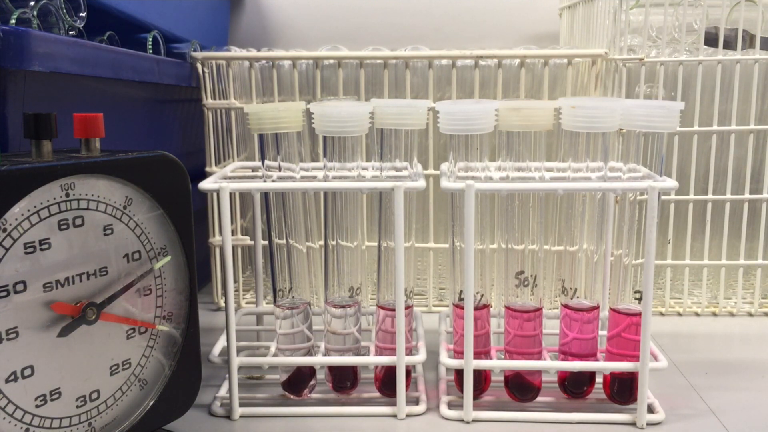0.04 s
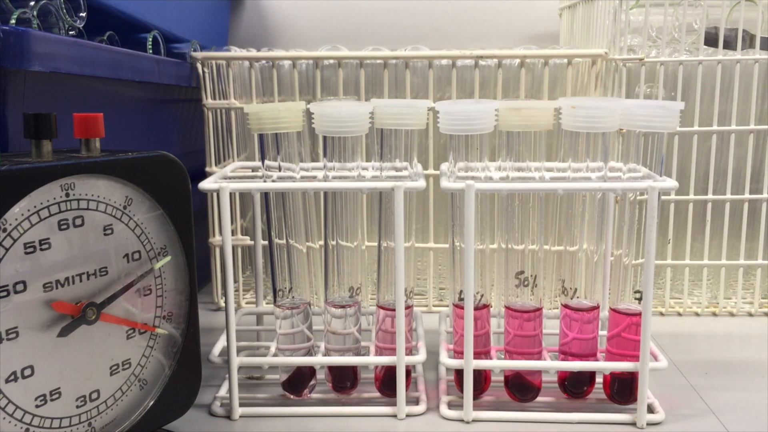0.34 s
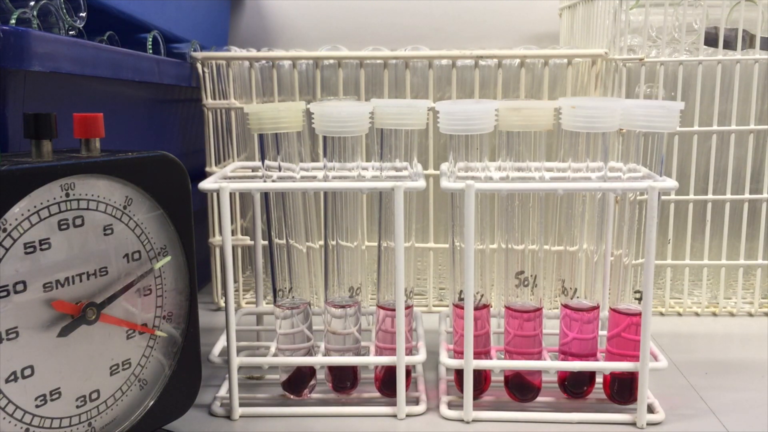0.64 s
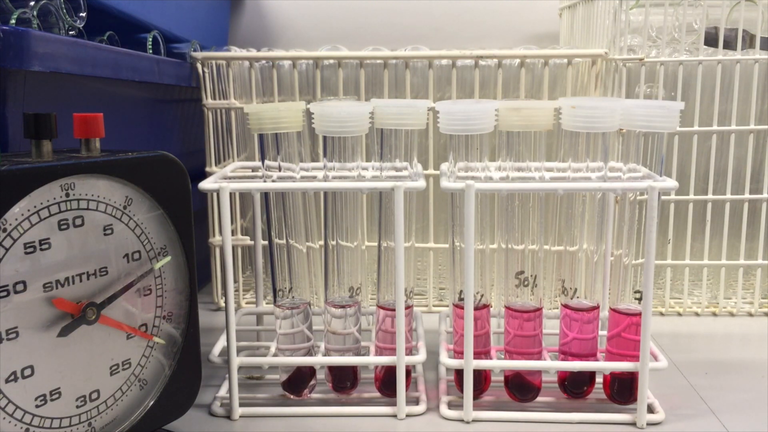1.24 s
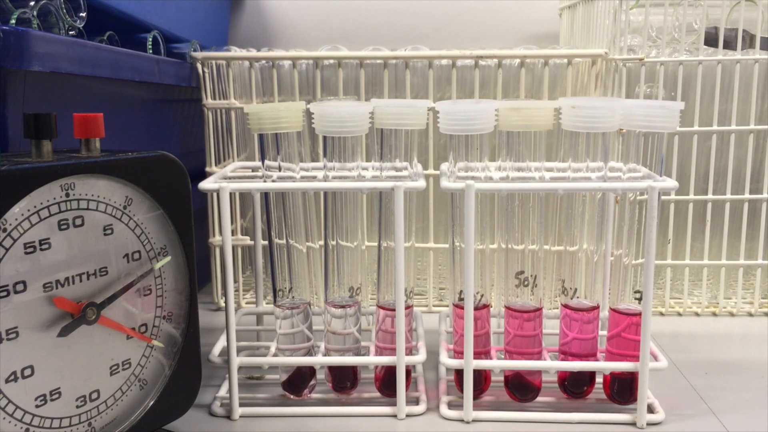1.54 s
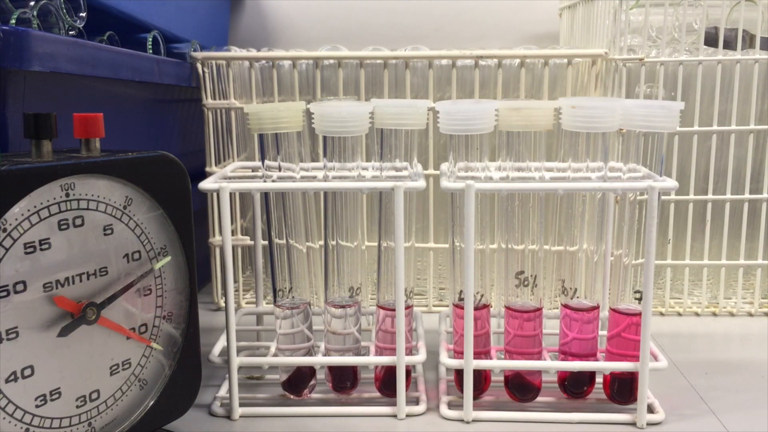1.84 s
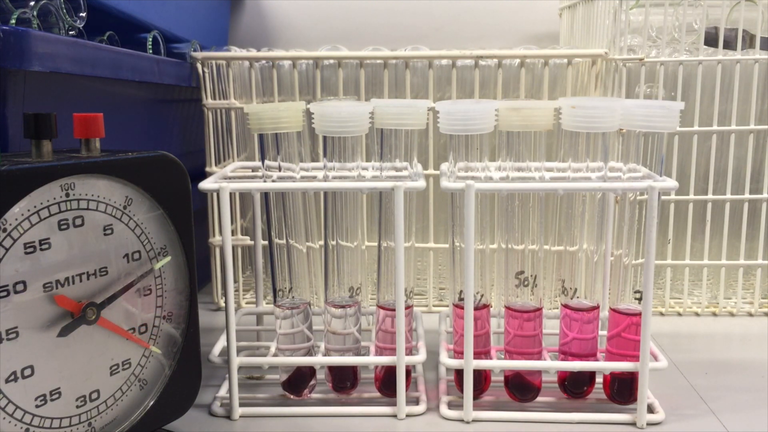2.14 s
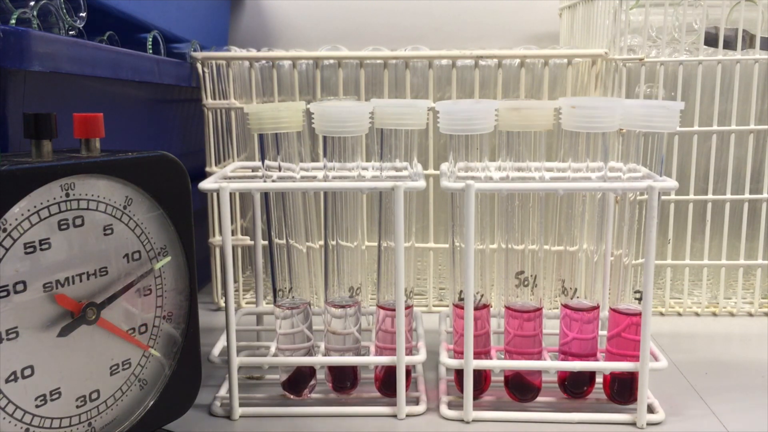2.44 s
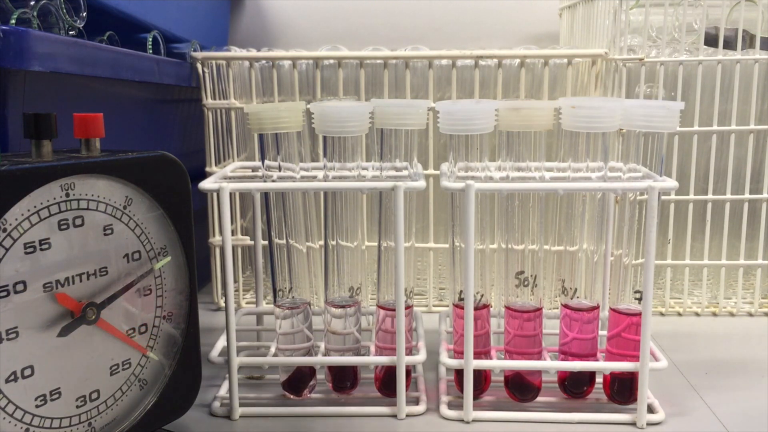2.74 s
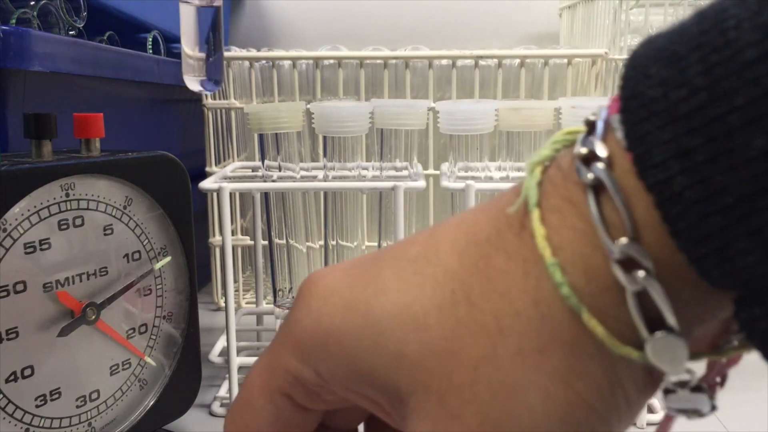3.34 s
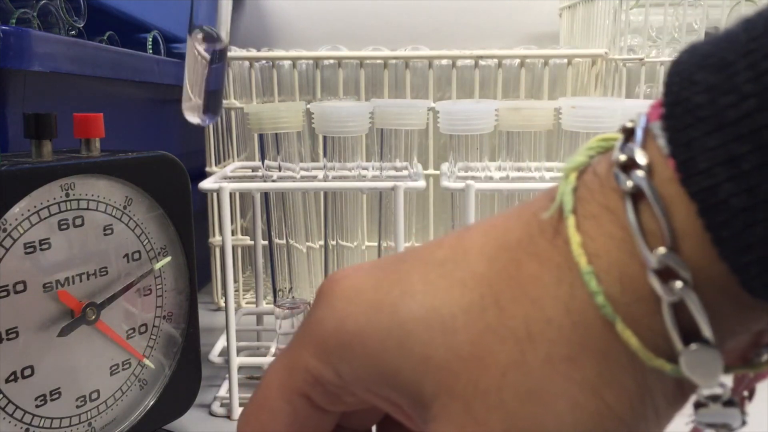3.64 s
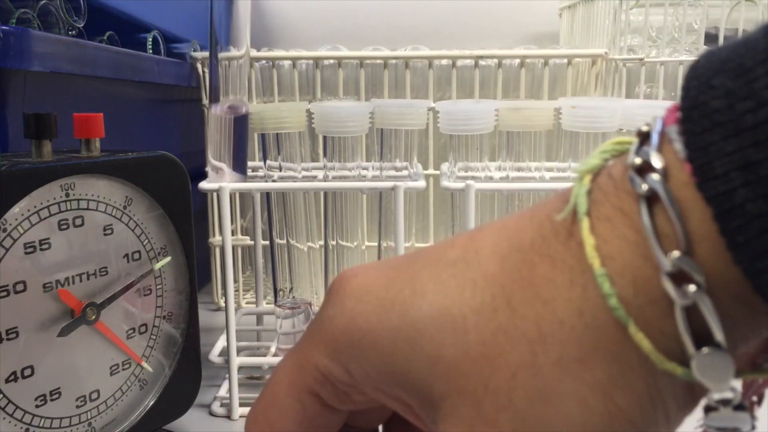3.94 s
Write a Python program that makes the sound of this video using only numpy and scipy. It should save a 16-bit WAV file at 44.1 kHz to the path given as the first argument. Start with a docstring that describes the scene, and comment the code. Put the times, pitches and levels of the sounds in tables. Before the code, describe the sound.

One sharp, close clack of glass landing on a bench rings briefly in a lab. It comes near the end, after a short squeak, soft bumps and small clinks, while a clock ticks quietly and ventilation rumbles throughout.

```python
"""Ventilation rumbles through a lab while a mechanical stop-clock ticks on the bench, its escapement
ringing the movement. Something being handled squeaks by stick-slip, the bench takes a few soft bumps,
and glassware clinks and whistles faintly. Then a glass vessel is set down close to the microphone:
it touches, chatters and lands with a clack that overloads the recorder and rings in the room."""
import sys
import numpy as np
from scipy import signal
from scipy.fft import rfft, irfft, next_fast_len
from scipy.io import wavfile
from scipy.ndimage import map_coordinates

SR = 44100
rng = np.random.default_rng(int(sys.argv[2]) if len(sys.argv) > 2 else 0)


def log_audio(samples):
    """Write samples as a 16-bit WAV file to the path given in sys.argv[1]."""
    # one column per channel
    frames = np.atleast_2d(samples).T
    # limit to full scale, then quantise
    limited = np.clip(frames, -1, 1)
    pcm = np.round(limited * 32767).astype(np.int16)
    wavfile.write(sys.argv[1], SR, pcm)


N = 176400
T = np.arange(SR // 4) / SR  # seconds within one short sound

# The vessel's modes. Each row: frequency in Hz, level in dB, t60 in seconds.
GLASS_MODES = [(1306, -20, 0.037), (2253, -17, 0.018), (3280, -20.5, 0.031), (4630, -22.5, 0.036),
               (5040, -13.5, 0.01), (5478, -14, 0.026), (5500, -1, 0.031), (6230, -19.5, 0.029),
               (8390, -15.5, 0.011)]
# Its highest modes, which contact does not shift. Each row: frequency in Hz, level in dB, t60 in seconds.
GLASS_TOP_MODES = [(14050, -20.5, 0.019), (14240, -18, 0.025), (13800, -25.5, .05)]


def amp(db):
    """Decibels to gain."""
    return 10 ** (np.asarray(db) / 20)


def unit(x):
    """Scale to rms 1."""
    return x / np.sqrt(np.mean(x ** 2) + 1e-20)


def along(points, hz):
    """Interpolate (Hz, value) points on a log frequency axis."""
    point_hz, values = np.transpose(points)
    return np.interp(np.log(hz + 1), np.log(point_hz + 1), values)


def filtered(x, response):
    """Filter x by a gain given as a function of Hz."""
    size = next_fast_len(len(x) + 8192)
    return irfft(rfft(x, size) * response(np.fft.rfftfreq(size, 1 / SR)), size)[:len(x)]


def noise(spectrum, size):
    """Noise of rms 1, coloured by (Hz, dB) points."""
    return unit(filtered(rng.standard_normal(size), lambda hz: amp(along(spectrum, hz))))


def wobble(rate, size):
    """A smooth random curve with `rate` knots a second."""
    return map_coordinates(rng.standard_normal(size // 8), [np.arange(size) * rate / SR], mode="mirror")


def fade(t60, t=T):
    """Exponential decay, 60 dB down after t60 seconds."""
    return np.exp(-np.log(1000) * t / t60)


def burst(spectrum, t60):
    """A dying puff of coloured noise."""
    return noise(spectrum, len(T)) * fade(t60)


def ring(modes, pitch=1, scatter_db=3.5, attack_s=0.00055):
    """Struck modes, a little different in level and phase at each blow."""
    out = np.zeros(len(T))
    for hz, db, t60 in modes:
        envelope = amp(db + scatter_db * rng.normal()) * fade(t60)
        out += envelope * np.sin(2 * np.pi * hz * pitch * T + 0.84 * rng.normal())
    return (1 - np.exp(-T / attack_s)) * out


def add(track, start, sound):
    """Mix a sound in at `start` seconds."""
    i = max(round(start * SR), 0)
    track[i:i + len(sound)] += sound[:max(N - i, 0)]


def ventilation(air_db=-43.5, sway_db=2.97, sway_below_hz=1800):
    """Room tone: moving air, a swaying rumble under a steady hiss, with unsteady fan and duct tones."""
    # The moving air. Each row: frequency in Hz, relative level in dB.
    air_spectrum = [(15, -58), (25, -21.5), (49, -6), (86, 2.5), (101, -4.5), (136, -12), (173, -3),
                    (198, -11), (215, -26), (246, -16.5), (281, -23.5), (482, -20), (684, -32), (871, -25),
                    (1080, -29.5), (1270, -26.5), (2360, -36.5), (2630, -41), (3090, -43.5), (12500, -57),
                    (15500, -53.5)]
    # Fan and duct tones. Each row: centre in Hz, half-width in Hz, level in dB.
    hums = [(80.15, 1.6, -54), (98.6, 2.2, -48.5), (119, 3, -54), (159.7, 3.7, -53), (252.9, 8.4, -63),
            (430.4, 21, -58), (901.4, 12, -66.5), (1241, 8.3, -69), (1488, 33, -69)]
    air = amp(air_db) * noise(air_spectrum, N)
    rumble = filtered(air, lambda hz: 1 / (1 + (hz / sway_below_hz) ** 4))
    air += (amp(sway_db * wobble(6.05, N)) - 1) * rumble
    for centre, width, db in hums:
        hum = filtered(rng.standard_normal(N), lambda hz: 1 / (1 + ((hz - centre) / width) ** 2))
        air += amp(db) * unit(hum)
    return air


def clock(tick_lead_s=0.046, tock_lead_s=0.034, slide_s=0.014, rebound_s=0.0023, snap_t60=0.044):
    """The clock on the bench: the pallet unlocks, a tooth slides, drops and rebounds, ringing the works."""
    # Escapement beats, tick and tock in turn. Each row: time in seconds, level in dB.
    beats = [(.0735, -38), (.3925, -44.5), (.6795, -40), (.9965, -42.5), (1.2842, -41), (1.6025, -44.5),
             (1.8902, -38.5), (2.209, -45), (2.4955, -41), (2.8142, -44), (3.101, -38.5), (3.42, -47.5),
             (3.7078, -40)]
    # The movement's modes. Each row: frequency in Hz, dB on the tick, on the tock and on unlocking,
    # t60 in seconds.
    movement_modes = [(2904, -7, 0, -30.5, 0.04), (3023, -8, -10, -28, 0.065),
                      (3670, -17, -16, -29.5, 0.045), (4010, -25, -9, -38, 0.019),
                      (4330, -23.5, -11, -28.5, 0.021), (5485, -13, -19.5, -26.5, .03),
                      (6040, -14, -19.5, -16.5, 0.029), (6900, -28, -15.5, -26.5, 0.045),
                      (9310, -20.5, -13.5, -31, 0.014), (12050, -31.5, -35, -28, .04)]
    # The snap of tooth on pallet. Each row: frequency in Hz, relative level in dB.
    snap_spectrum = [(1200, -22.5), (2400, -8.5), (3100, 4.5), (6200, -3.5), (8000, -21), (15000, -14)]
    out = np.zeros(N)
    hz, tick_db, tock_db, unlock_db, t60 = np.transpose(movement_modes)
    for k, (time, db) in enumerate(beats):
        drop_db, lead_s = (tock_db, tock_lead_s) if k % 2 else (tick_db, tick_lead_s)
        unlock = ring(zip(hz, unlock_db, t60)) + amp(-20.5) * burst(snap_spectrum, snap_t60)
        add(out, time - lead_s, amp(db) * unlock)
        slide = np.minimum(T / slide_s, 1) * burst(snap_spectrum, t60=0.11)
        add(out, time - slide_s, amp(db - 12) * slide)
        for delay, boost_db in (0, 0), (rebound_s, 3):  # the drop, then its louder rebound
            metal = ring(zip(hz, drop_db, t60), pitch=1 + 0.01 * rng.normal(), scatter_db=2.5)
            snap = amp(-15) * burst(snap_spectrum, snap_t60)
            add(out, time + delay, amp(db + boost_db) * (metal + snap))
    return out


def squeaks(settle_s=0.0044, edge_s=0.0033, flutter_db=3.2, rub_db=-20.5):
    """Stick-slip on a smooth surface: each note grabs roughly, settles to a tone and rises to let go."""
    # Each row: start in seconds, length in seconds, base pitch in Hz, level in dB,
    # final rise as a share of the pitch, dB of harmonics 1-8.
    notes = [(0.2675, 0.022, 1912, -28, 0.12, (-13.5, -1.5, -14, -19.5, -18, -23, -10.5, -18)),
             (0.2889, .037, 2330, -22, .13, (-4, -23.5, -13, -17.5, -30, -30, -40, -60)),
             (1.174, 0.016, 2550, -53.5, 0.011, (5, -30, -33, -35, -40, -45, -60, -60)),
             (2.35, 0.0087, 2470, -47, 0.071, (10, -14, -15, -68, -10, -16, -60, -60))]
    # The rubbing under the tone. Each row: frequency in Hz, relative level in dB.
    rub_spectrum = [(1200, -30), (2200, 15), (3200, -3), (6200, 1), (8200, -1), (11000, -33), (13900, 5),
                    (15500, -5)]
    out = np.zeros(N)
    grab = np.exp(-T / settle_s)  # each note starts sharp and unsteady
    for start, length, base_hz, db, rise, harmonics in notes:
        progress = np.minimum(T / length, 1)
        jitter = (0.003 + 0.091 * grab) * wobble(1550, len(T))
        hz = base_hz * (1 + 0.057 * grab + rise * progress ** 4 + jitter)
        phase = 2 * np.pi * np.cumsum(hz) / SR
        tone = sum(amp(level + flutter_db * wobble(222, len(T))) * np.sin(k * phase)
                   for k, level in enumerate(harmonics, 1))
        rub = amp(rub_db) * (1 + 2 * grab) * noise(rub_spectrum, len(T))
        envelope = np.clip(np.minimum(T, length - T) / edge_s, 0, 1)
        add(out, start, amp(db) * envelope * (tone + rub))
    return out


def bumps(attack_s=0.0023):
    """Handling bumps the bench: soft, low thuds."""
    # Each row: start in seconds, level in dB.
    thuds = [(1.615, -38.5), (1.632, -43), (2.129, -43.5)]
    # The dull sound of the bench. Each row: frequency in Hz, relative level in dB.
    thud_spectrum = [(90, -3.5), (150, 1.5), (280, 1), (450, -14), (1200, -43), (4000, -60)]
    out = np.zeros(N)
    for start, db in thuds:
        add(out, start, amp(db) * (1 - np.exp(-T / attack_s)) * burst(thud_spectrum, t60=0.22))
    return out


def clinks(held_t60_ratio=0.45):
    """Glass, damped by the hand, is touched and scraped lightly; thin glass pings on."""
    # Each row: start in seconds, ring in dB, scratch in dB, pitch ratio.
    touches = [(2.354, -45, -40, 1.1), (2.358, -60, -35.5, 1.3), (2.374, -33.5, -33.5, 1.02),
               (2.473, -56, -29.5, 1.1), (2.4771, -18.5, -60, 0.99), (3.979, -60, -59, 1)]
    # The scrape on the glass. Each row: frequency in Hz, relative level in dB.
    scratch_spectrum = [(900, -13), (1900, -6), (2700, 4.5), (4300, 0), (7000, -12.5), (9500, -13),
                        (11300, -36), (13200, -8), (15500, -5.5)]
    # Thin glass left ringing. Each row: start in seconds, frequency in Hz, level in dB, t60 in seconds.
    pings = [(2.374, 11950, -58, 0.21), (2.473, 10500, -53, .06)]
    out = np.zeros(N)
    held_modes = [(hz, db, t60 * held_t60_ratio) for hz, db, t60 in GLASS_MODES]
    for start, ring_db, scratch_db, pitch in touches:
        glass = ring(held_modes, pitch) + amp(-6) * ring(GLASS_TOP_MODES)
        scratch = burst(scratch_spectrum, t60=0.041)
        add(out, start, amp(ring_db) * glass + amp(scratch_db) * scratch)
    for start, hz, db, t60 in pings:
        add(out, start, ring([(hz, db, t60)]))
    return out


def whistles(db=-74, waver_hz=90):
    """Thin rising whistles as the glass is moved, barely reaching the microphone."""
    # Each row: start in seconds, length in seconds, first and last pitch in Hz.
    glides = [(2.835, .105, 11350, 12650), (3.01, .055, 11400, 12200), (3.066, 0.095, 11300, 12140)]
    out = np.zeros(N)
    for start, length, first_hz, last_hz in glides:
        progress = np.minimum(T / length, 1)
        hz = first_hz + (last_hz - first_hz) * np.sin(np.pi / 2 * progress)
        hz += waver_hz * wobble(150, len(T))
        tone = np.sin(2 * np.pi * np.cumsum(hz) / SR)
        add(out, start, amp(db) * np.sin(np.pi * progress) * tone)
    return out


def vessel(landing_s=3.27, landed_pitch=1.05):
    """The vessel is set down close to the microphone: each contact rings it and knocks the bench top."""
    # Touch, chatter and landing. Each row: start in seconds, then ring, knock and crack in dB.
    contacts = [(3.2061, 0, -10, -9.5), (3.2096, -15.5, -30, -45.5), (3.2224, -6.5, -14, -27.5),
                (3.2308, -4, -14.5, -31), (3.238, -4.5, -17, -31), (3.246, -16.5, -28.5, -41),
                (3.2716, -8.5, -4.5, -7), (3.2747, -3, -6.5, -19.5), (3.277, -8.5, -22.5, -27)]
    # The knock, the bench top's answer and the hard instant of contact.
    # Each row: frequency in Hz, relative level in dB.
    knock_spectrum = [(120, -25), (260, -1.5), (520, -14.5), (750, -11), (1400, -10.5), (2800, 4),
                      (4500, 4), (6500, 5), (9000, -11), (12000, -14), (15500, -9)]
    bench_spectrum = [(130, -37), (270, 2.5), (520, -15.5), (750, 2), (1400, -2.5), (3000, -1.5),
                      (6000, -23.5), (12000, -34)]
    crack_spectrum = [(1000, -15.5), (5000, -3), (8500, 5), (10500, -10.5), (13000, 3), (15500, -3)]
    out = np.zeros(N)
    for start, ring_db, knock_db, crack_db in contacts:
        landed = start > landing_s
        glass = ring(GLASS_MODES, landed_pitch if landed else 1) + ring(GLASS_TOP_MODES)
        if landed:  # struck harder, and damped by the bench
            glass *= amp(2) * fade(t60=0.025)
        knock = burst(knock_spectrum, t60=0.018) + amp(-14) * burst(bench_spectrum, t60=0.12)
        crack = burst(crack_spectrum, t60=0.0073)
        add(out, start, amp(ring_db) * glass + amp(knock_db) * knock + amp(crack_db) * crack)
    return out


def room(x, colour, build_s=0.0065):
    """What the lab's walls send back to the microphone: each frequency dies at its own speed."""
    # Each row: frequency in Hz, t60 in seconds.
    decay_times = [(200, 0.82), (600, 0.36), (1500, .52), (5700, 0.46), (9000, 0.38), (14000, .28)]
    hz, t, spectra = signal.stft(rng.standard_normal(SR * 3 // 4), SR, nperseg=256)
    decay = fade(along(decay_times, hz)[:, None], t)
    tail = signal.istft(spectra * decay, SR, nperseg=256)[1]
    tail = filtered(tail / np.linalg.norm(tail), lambda f: amp(along(colour, f)))
    build_up = 1 - np.exp(-np.arange(len(tail)) / SR / build_s)
    return signal.fftconvolve(x, tail * build_up)[:N]


def scene():
    """One microphone at the bench hears the room tone, the sources direct, and the walls' return."""
    # The colour of the reverberation. Each row: frequency in Hz, gain in dB.
    room_colour = [(150, 0.5), (700, 1), (2500, -3.5), (5500, -6), (9000, -6.5), (14000, -14)]
    # The same for the squeaks, which throw their treble at the walls.
    squeak_colour = [(1500, -3), (2400, -6.5), (4000, -6.5), (6200, 3), (9500, -13), (14000, 2)]
    sources = [(clock(), -10, room_colour), (squeaks(), -10, squeak_colour),
               (clinks() + bumps(), -10, room_colour), (vessel(), -8, room_colour)]
    mix = ventilation() + whistles()
    for direct, room_db, colour in sources:
        mix += direct + amp(room_db) * room(direct, colour)
    return mix[None]


def record(dry, ceiling=0.94, hardness=15, low_cut_hz=36, top_hz=15900):
    """The recorder clips the loudest peaks, cuts the deep bass and keeps nothing above its band limit."""
    clipped = dry[0] / (1 + np.abs(dry[0] / ceiling) ** hardness) ** (1 / hardness)
    thinned = filtered(clipped, lambda hz: 1 / np.sqrt(1 + (low_cut_hz / (hz + 1)) ** 10))
    return filtered(thinned, lambda hz: 1 / (1 + (hz / top_hz) ** 200))[None]


dry = scene()
out = record(dry)
log_audio(out)
```